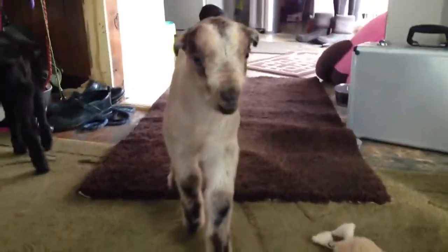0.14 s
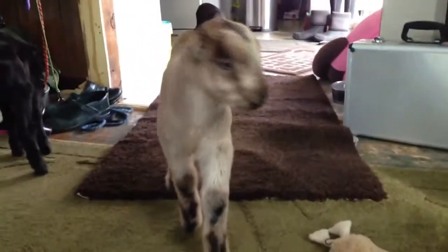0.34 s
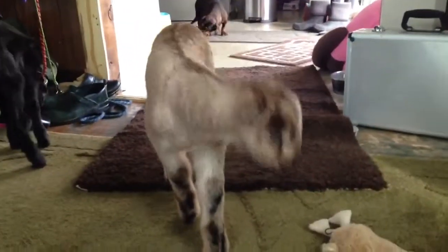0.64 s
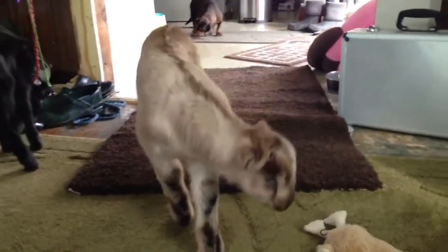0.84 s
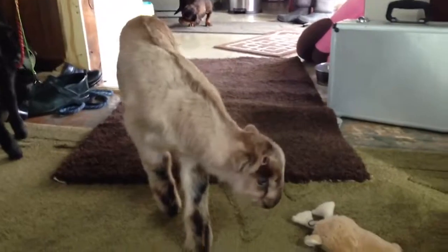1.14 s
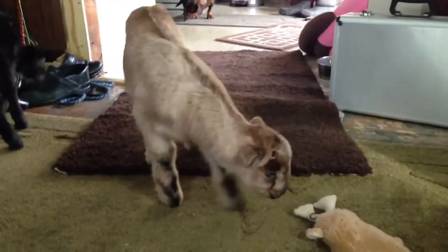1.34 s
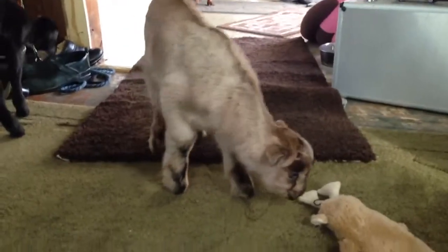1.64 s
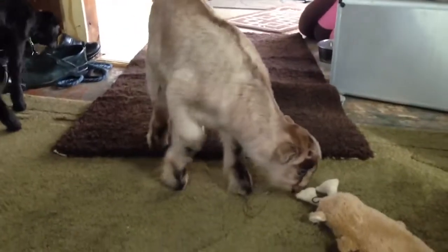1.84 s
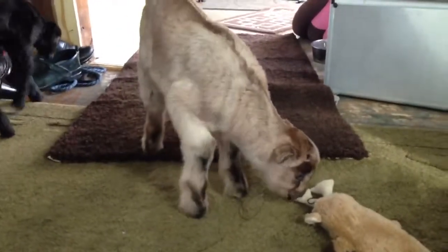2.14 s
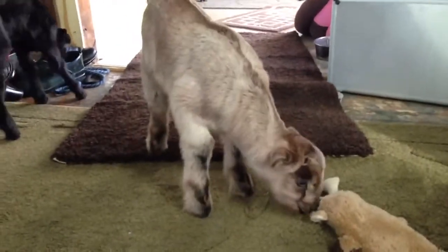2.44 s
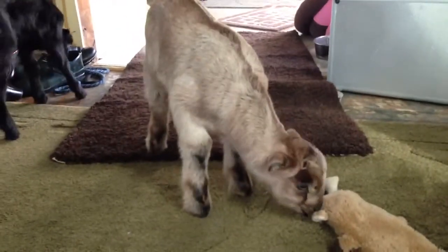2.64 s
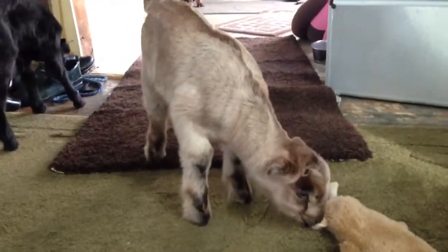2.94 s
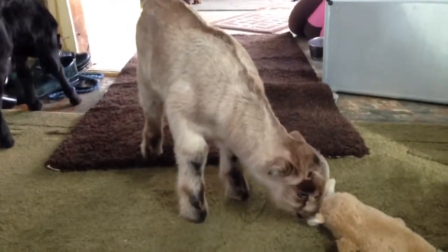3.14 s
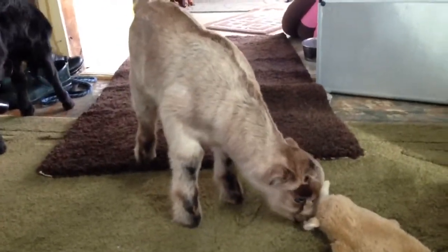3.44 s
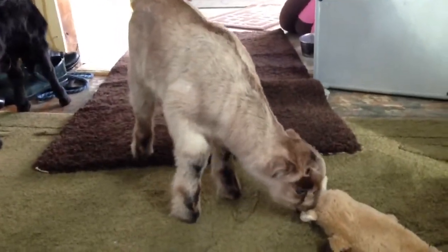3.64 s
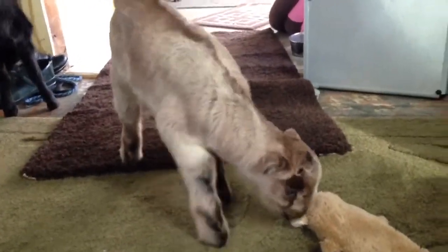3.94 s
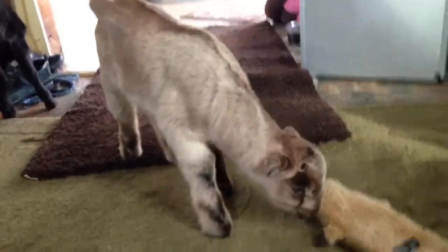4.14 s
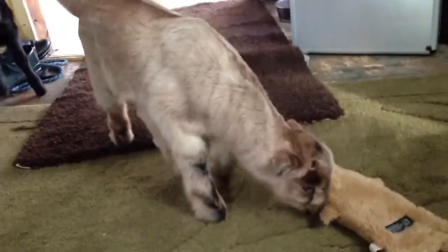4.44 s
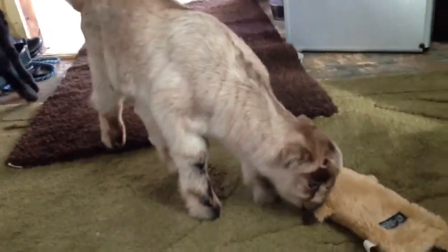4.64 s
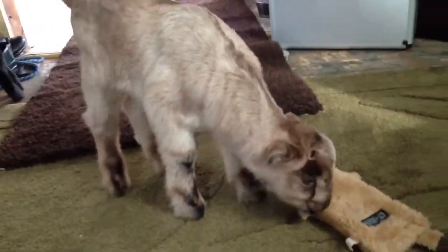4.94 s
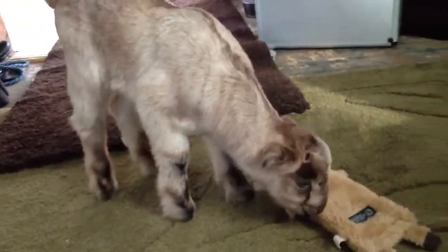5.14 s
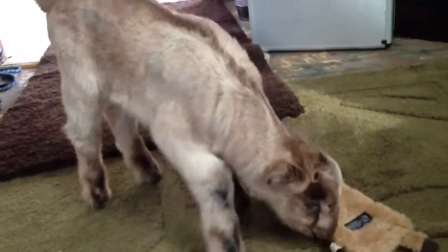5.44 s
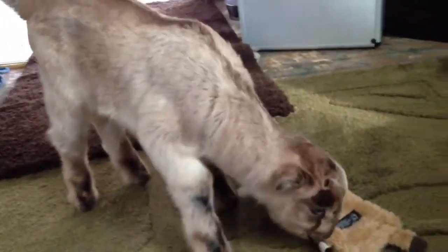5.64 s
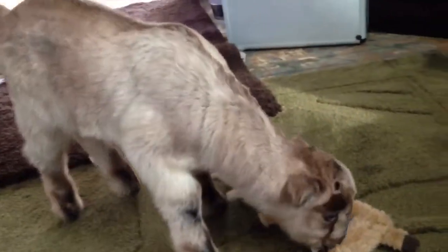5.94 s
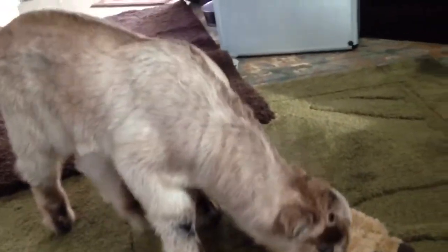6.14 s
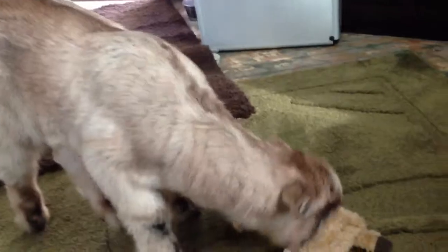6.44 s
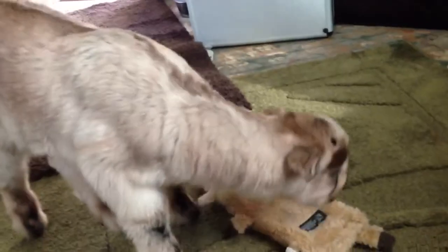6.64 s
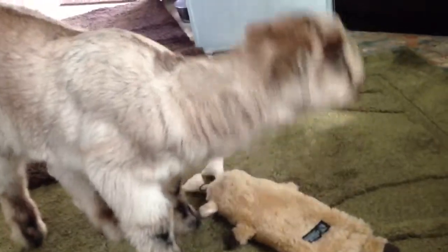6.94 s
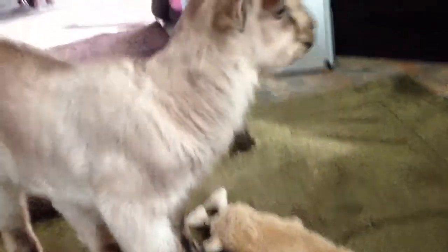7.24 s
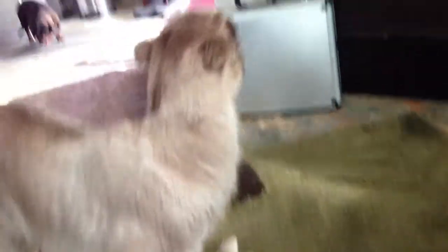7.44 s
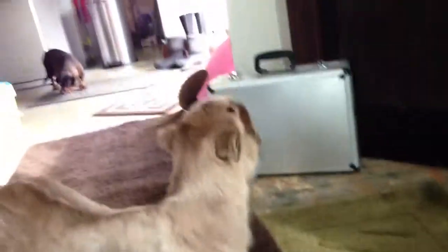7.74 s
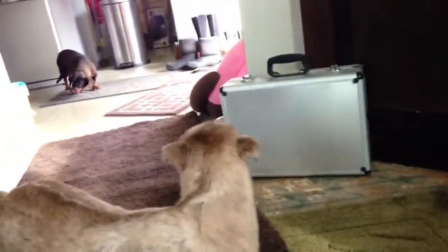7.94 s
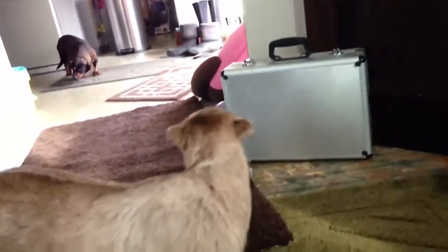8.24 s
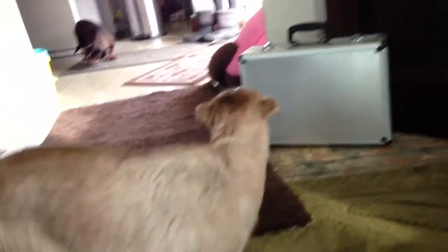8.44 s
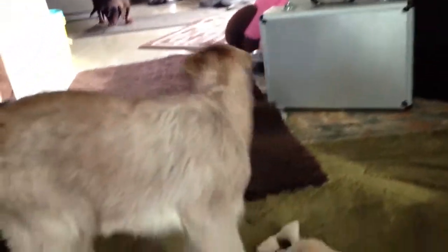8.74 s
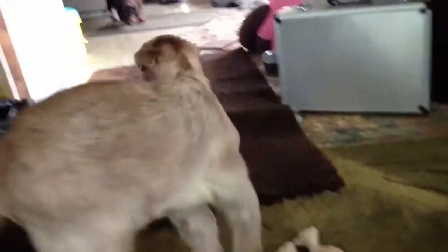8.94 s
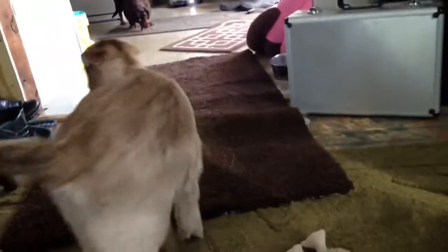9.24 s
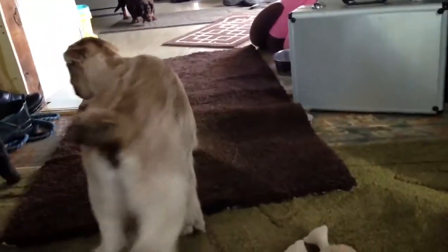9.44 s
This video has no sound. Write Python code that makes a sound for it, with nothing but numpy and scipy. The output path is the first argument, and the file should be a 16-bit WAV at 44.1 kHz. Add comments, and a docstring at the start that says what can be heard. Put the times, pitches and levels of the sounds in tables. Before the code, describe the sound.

A quiet, small carpeted room, heard through a close microphone with little deep bass and a faint constant hiss. From 0.5 seconds a goat kid's hooves make dull, padded thuds, with brushing scuffs around 1.4 and stronger steps and scrapes between 1.6 and 2.5. It then grows calmer, with very faint pads and a firmer, clickier thud at 4.5. From 5.6, thin wooden squeaks creep in, barely audible, sharpening at 6.6 into a brief squeak and a loud clatter of overlapping knocks until about 7.1, with soft shuffling. At 7.6 the kid bleats once: pitch scoops up quickly, then about six rapid, bright nasal throbs with hoarse air between them, weakening after 8.1 and gone by 8.35, with a short room tail. Soft steps, rustles and tiny ticks follow around 8.5 to 8.9, a firmer thud at 9.2, and light scuffs near 9.5.

```python
"""Goat kid bleating in a carpeted room

Close to the microphone a goat kid moves about and gives one loud, quavering bleat: throbbing voice partials
shaped by a moving mouth, with a hoarse rush of air. Its hooves thud on the carpet as short ringing modes;
rustles and scuffs are coloured noise. Something wooden out of sight squeaks in unsteady tones and clatters
in noise bursts. The small room answers with a brief diffuse tail, over a faint hiss."""
import sys
import numpy as np
from scipy import signal
from scipy.fft import rfft, irfft, next_fast_len
from scipy.io import wavfile
from scipy.ndimage import map_coordinates

SR = 44100
rng = np.random.default_rng(int(sys.argv[2]) if len(sys.argv) > 2 else 0)


def store_pcm(level_fs):
    """Save levels as 16-bit WAV."""
    pcm = np.round(np.clip(level_fs, -1, 1) * 32767).astype(np.int16)
    wavfile.write(sys.argv[1], SR, np.atleast_2d(pcm).T)


N = 422919

# The bleat's pitch scoops up, catches, then arches gently.
# Each row: time in seconds, pitch in Hz before the quaver.
BLEAT_PITCH = [(7.597, 270), (7.65, 348), (7.697, 323), (7.72, 372), (7.755, 384), (7.85, 380), (7.95, 387),
               (8.05, 397), (8.12, 405), (8.16, 382), (8.3, 385)]
# Throbs of the bleat. Each row: peak in seconds, gain in dB, half-width in seconds,
# brightness in dB per octave, first formant's added gain in dB, mouth narrowing from 0 to 1.
BLEAT_THROBS = [(7.636, -38.5, 0.022, -5.5, -3.5, 0.4), (7.746, -22.5, 0.014, 1.5, 4.5, 0),
                (7.848, -22, 0.013, .5, -0.5, 0.13), (7.958, -22.5, .016, -1, 1.5, .5),
                (8.055, -25.5, 0.02, -2, 1, 1), (8.151, -27.5, 0.014, -2, 3, 0.18)]
# Resonances of the mouth. Each row: Hz when closed, Hz when open, glide in Hz per second,
# shift in Hz when narrowed, width in Hz, gain in dB.
MOUTH_FORMANTS = [(606, 1196, 220, 110, 250, 3.5), (1370, 2780, -400, -480, 290, -8.5),
                  (1940, 3120, 640, -90, 240, -1.5), (3330, 4770, -300, -450, 400, -4),
                  (7400, 5860, 104, -1150, 470, -8.5)]
# Broad colour of the throat under the formants. Each row: frequency in Hz, gain in dB.
THROAT_COLOUR = [(300, -27.5), (400, -20), (780, -27.5), (2000, -17.5), (4000, -23.5), (6500, -18.5),
                 (7700, -20.5), (9200, -29.5), (10500, -31.5), (12000, -50), (15000, -47)]
# Roughness of the voice while pressed. Each row: frequency in Hz, roughness from 0 to 1.
VOICE_RASP = [(400, 0.05), (1200, 0.03), (3000, 0.23), (6000, 0.33), (10000, 0.53)]
# Hoarse rush of air through the open mouth. Each row: frequency in Hz, relative density in dB per Hz.
HOARSE_AIR = [(250, -36), (900, -15), (1300, 8), (1650, -13), (1900, -4.5), (2350, -1), (2750, -11),
              (3150, 3), (3800, -3), (4600, -1.5), (6200, -12), (9000, -18), (14000, -33)]
# Hooves on the carpet. Each row: start in seconds, level in dB, pitch in Hz, t60 in seconds,
# toe click in dB relative to the step.
HOOF_STEPS = [(.503, -44, 295, 0.043, -30), (.884, -59.5, 676, 0.17, -8), (1.094, -64, 890, 0.064, -12),
              (1.143, -51.5, 221, 0.093, -12), (1.618, -36.5, 725, 0.056, -12),
              (1.997, -32.5, 304, 0.076, -25), (2.2, -59, 850, .15, -8), (2.378, -49.5, 340, 0.072, -20),
              (2.439, -39.5, 240, 0.05, -14), (2.521, -47, 995, .08, -4), (2.828, -54, 450, .1, -10),
              (3.89, -65, 290, .11, -7), (4.484, -36.5, 187.5, 0.12, 2), (4.594, -58, 181, 0.071, -17),
              (4.75, -54, 900, 0.05, -3), (4.945, -57.5, 730, 0.096, -6), (5.04, -63, 990, 0.054, -1),
              (5.674, -59, 380, 0.15, -12), (8.546, -51, 418, .25, -22.5), (8.735, -49, 425, 0.3, -21),
              (9.170, -37.5, 187, 0.081, -5.5), (9.412, -53, 264, 0.1, -19), (9.502, -45.5, 404, .12, -10)]
# Modes of the floor. Each row: multiple of the step's pitch, relative level in dB.
FLOOR_MODES = [(0.619, -1.5), (.82, -1), (1, 4.5), (1.221, -3.5), (1.7, -12), (2.15, -16), (3, -25)]
# Scuffs and brushes. Each row: start in seconds, level in dB, brightness in dB per octave.
SCUFF_EVENTS = [(.588, -53.5, 0), (.683, -56.5, 0), (.752, -51.5, -0.5), (1.298, -59, -5),
                (1.376, -49.5, 1), (1.413, -46.5, 2.5), (1.468, -51, 4.5), (1.603, -38.5, -.5),
                (1.786, -47, 5), (1.892, -48.5, 2), (2.308, -55.5, 3), (2.432, -43.5, .5),
                (2.57, -48, -0.5), (2.933, -48.5, -1), (3.89, -64, -2), (5.374, -61, 1.5), (5.43, -61, 4),
                (5.774, -58, 7.5), (6.193, -54.5, 2), (8.595, -58.5, 4), (8.728, -50, 1.5), (9.055, -53, 0),
                (9.528, -52, -3.5)]
# Colour of scuffs and scrapes. Each row: frequency in Hz, relative density in dB per Hz.
FABRIC_COLOUR = [(90, -43), (170, -6.5), (400, 2.5), (550, 1), (720, 1), (1100, 1), (1600, -5.5),
                 (2500, -4.5), (4000, -9.5), (7000, -16.5), (11000, -27.5), (15000, -37.5)]
# Bouts of shuffling. Each row: start in seconds, length in seconds, level in dB, slope in dB per second.
SHUFFLE_BOUTS = [(0.665, .17, -58.5, -2), (1.354, 0.29, -51.5, 6), (1.63, 0.64, -55, -3.5),
                 (2.404, 0.64, -57, -12.5), (5.613, 0.15, -61, -10), (6.143, 0.082, -57.5, -18),
                 (6.93, .08, -46, -40), (7.06, 0.5, -52.5, -10.5), (8.616, 0.54, -52, -4.5),
                 (9.07, 1, -55.5, -24)]
# Colour of the shuffling. Each row: frequency in Hz, relative density in dB per Hz.
SHUFFLE_COLOUR = [(71, -41), (120, -9.5), (324, -6.5), (361, -10), (433, 1), (537, -7), (785, -7.5),
                  (860, -7), (958, -9), (2280, -10.5), (2990, -14.5), (9000, -30.5), (11700, -55),
                  (19800, -120)]
# Tiny clicks. Each row: start in seconds, level in dB.
TINY_TICKS = [(8.79, -44), (8.853, -47.5), (8.889, -56)]
# Wooden clatter. Each row: start in seconds, level in dB, t60 in seconds,
# brightness in dB per octave, bass lift in dB.
WOOD_KNOCKS = [(6.614, -35, 0.062, 5, -11.5), (6.695, -26, 0.11, -1, -10.5), (6.779, -20, 0.074, .5, 3.5),
               (6.955, -26.5, 0.076, 1.5, 9), (7.058, -33.5, .076, -3.5, -.5), (7.118, -42, 0.19, -3.5, 1)]
# Broad colour of the wood. Each row: frequency in Hz, relative density in dB per Hz.
WOOD_COLOUR = [(120, -41), (200, -14), (300, -10.5), (440, -2.5), (760, 3), (940, -10), (1150, 0),
               (1450, -3), (1900, -4), (2650, -3.5), (3500, -12), (6500, -22), (10000, -34), (15000, -39)]
# Resonances of the wood. Each row: centre in Hz, width in Hz, strength in dB (a quarter of it counts).
WOOD_RESONANCES = [(432, 41, 17), (1420, 33, -18), (1860, 53, 33), (2220, 15, -37), (2600, 54, -5),
                   (4180, 75, 10), (6840, 66, -16), (7840, 31, -35)]
# Squeaks. Each row: start in seconds, length in seconds, gain in dB, brightness in dB per octave.
SQUEAK_EVENTS = [(5.596, 0.28, -67.5, -19), (6.098, 0.15, -61.5, -11), (6.3, .32, -67, -12),
                 (6.542, .055, -51, -2.5), (6.614, 0.039, -36.5, 1.5), (6.66, 0.03, -45, -13)]
# Partials of the squeaking wood. Each row: frequency in Hz, relative level in dB.
SQUEAK_PARTIALS = [(1238, -6), (1857, -7.5), (2995, -0.5), (3700, -17), (4600, -14.5), (5400, -21)]
# Wood ringing on as it breaks free. Each row: frequency in Hz, level in dB, t60 in seconds.
WOOD_RING = [(1836, -25, 0.052), (2650, -35, .15), (3225, -30.5, 0.19)]
# Colour of the background hiss. Each row: frequency in Hz, relative density in dB per Hz.
HISS_COLOUR = [(25, 9.5), (60, 1), (100, -10), (150, 0), (300, -0.5), (500, -5.5), (1000, -9),
               (1800, -10.5), (3100, -8), (6000, -9.5), (10000, -12), (15500, -12.5)]
# Decay of the room. Each row: frequency in Hz, t60 in seconds.
ROOM_DECAY = [(200, .28), (1200, 0.34), (4000, 0.25), (8000, 0.28), (14000, 0.12)]

OPEN_S, OPENING_S = 7.712, 0.076  # the mouth is wide open by then, and takes this long to open
ONSET_S, RELAX_S, RELEASE_S = 0.022, 8.18, 0.035  # full voice comes on this fast, holds until then, lets go
VOICE_TRAIL_DB, AIR_TRAIL_DB = -16, -10  # a weak, airy trail remains
FADE_S, END_S = 0.05, 8.335  # the trail fades out over this long and ends then
QUAVER, QUAVER_LAG_S = 0.016, 0.021  # pitch dips by about this share before each throb and lifts after it
TOE_HZ, TOE_OCTAVES, TOE_T60 = 550, 0.86, 0.043  # the hard toe's dull click: centre, spread, decay in s
SCRAPE_DB, USUAL_STEP_DB = -59.5, -49  # scrape of a step of the usual force
SCRAPE_GROWS = 0.49  # dB of scrape per dB of force
PADS_PER_S, PAD_DB, PAD_HZ = 2.2, -64.5, 563  # light shifts of weight
SCUFF_RISE_S, SCUFF_T60 = 0.01, 0.26
BOUT_RISE_S, BOUT_T60 = 0.067, 0.39
KNOCK_DB, KNOCK_RISE_S, KNOCK_EDGE_HZ = -26.5, 0.01, 9800  # a typical knock: level, build-up, top edge
EDGE_DB_PER_OCTAVE, RISE_DB_PER_DOUBLING = 8, 31  # harder knocks reach higher and build up for longer
RING_S, RING_RISE_S = 6.7, 0.018
HISS_DB = -63.5
TOP_HZ = 15720  # the recorder's band limit


def bleat(held_db=-46, air_db=-43.0, jitter=0.002, slack=4, lead_s=0.003, echo_s=0.026, echo_db=-11):
    """Vocal folds, pressed about ten times a second, turn hoarse between the throbs."""
    start, end = BLEAT_PITCH[0][0], END_S
    t = np.arange(round(start * SR), round(end * SR)) / SR
    throbs = throbbing(t)
    # the folds tighten just before each throb peaks
    pressed = np.interp(t + lead_s, t, np.minimum(throbs.sum(0), 1))
    onset = np.clip(1 + (t - OPEN_S) / ONSET_S, 0, 1)
    release = np.clip((t - RELAX_S) / RELEASE_S, 0, 1)
    full_voice = onset * amp(VOICE_TRAIL_DB * release)
    unsteady = 1 + slack * (1 - pressed * full_voice)  # slack folds beat unevenly

    lift = QUAVER * (throbbing(t - QUAVER_LAG_S).sum(0) - throbbing(t + QUAVER_LAG_S).sum(0))
    pitch = curves(BLEAT_PITCH, t)[0] * (1 + lift + jitter * unsteady * wobble(250, len(t)))

    puffs = 1 + 0.5 * np.cos(2 * np.pi * np.cumsum(pitch) / SR)  # air escapes once a cycle
    rush = noise(lambda hz: along(HOARSE_AIR, hz), len(t))
    air = amp(air_db + AIR_TRAIL_DB * release) * onset * puffs * rush

    effort = amp(held_db) * full_voice + amp(np.array(BLEAT_THROBS)[:, 1]) @ throbs
    voice = effort * harmonics(t, pitch, pressed, unsteady)

    fade = np.clip(np.minimum((t - start) / 0.004, (end - t) / FADE_S), 0, 1)
    call = (voice + air) * fade
    far_wall = amp(echo_db) * filtered(call, lambda hz: 1 / (1 + 1j * hz / 4000))
    out = np.zeros(N)
    add(out, start, call)
    add(out, start + echo_s, far_wall)
    return out


def throbbing(t):
    """Each press of the folds swells and eases as a bell curve from 0 to 1."""
    return np.array([np.exp(-((t - s) / width) ** 2) for s, db, width, *_ in BLEAT_THROBS])


def harmonics(t, pitch, pressed, unsteady, strain_db=2, spread=0.116):
    """The folds' partials, coloured by the throat and the moving mouth."""
    phase = 2 * np.pi * np.cumsum(pitch) / SR
    *_, bright_db, first_db, narrowing = curves(BLEAT_THROBS, t)
    bright_db = bright_db + strain_db * (pressed - 1)  # harder pressing closes the folds more sharply
    resonances = []
    for i, (centre, row) in enumerate(zip(formants(t, narrowing), MOUTH_FORMANTS)):
        *_, width, db = row
        resonances.append((centre, width, db + first_db * (i == 0)))
    voice = np.zeros(len(t))
    for k in np.arange(1, 39):
        hz = k * pitch
        mouth = sum(amp(db) / (1 + ((hz - centre) / width) ** 2) ** 2 for centre, width, db in resonances)
        tilt = amp(bright_db * np.maximum(octaves(hz), -1.5))
        gain = (mouth + amp(along(THROAT_COLOUR, hz))) * tilt
        # resonances ring on after each closure
        ring_lag = sum(np.arctan((hz - centre) / width) for centre, width, db in resonances)
        fold_lag = spread * k ** 2  # the folds close gradually along their length
        rasp = np.minimum(along(VOICE_RASP, hz) * unsteady, 0.95)
        rough = unit(wobble(330, len(t)) + 1j * wobble(330, len(t)))
        tone = np.sqrt(1 - rasp ** 2) + rasp * rough
        voice += gain * np.real(tone * np.exp(1j * (k * phase - ring_lag - fold_lag)))
    return voice


def formants(t, narrowing):
    """Centres of the mouth's resonances: it opens, drifts, and narrows on some throbs."""
    opening = np.clip(1 + (t - OPEN_S) / OPENING_S, 0, 1)
    centres = []
    for closed, wide, glide, shift, *_ in MOUTH_FORMANTS:
        travel = wide - closed + glide * (t - OPEN_S) + shift * narrowing
        centres.append(closed + opening * travel)
    return centres


def hooves(second_s=0.019, second_db=-8, pad_t60=0.094, pad_toe_db=-10):
    """Each step rings the padded floor twice, toe and heel, with a scrape; light pads fall at random."""
    out, t = np.zeros(N), np.arange(SR // 3) / SR
    pads = []
    for u, v in rng.random((round(PADS_PER_S * N / SR), 2)):
        pad_pitch = PAD_HZ * 2 ** (2 * v - 1)  # within an octave either way
        pads.append((u * N / SR, PAD_DB, pad_pitch, pad_t60, pad_toe_db))
    toe_colour = lambda hz: -20 * np.log10(1 + (np.log2((hz + 1) / TOE_HZ) / TOE_OCTAVES) ** 4)
    for s, db, pitch, t60, toe_db in [*HOOF_STEPS, *pads]:
        toe = noise(toe_colour, len(t)) * swell(t, 0.0037, TOE_T60)
        add(out, s, amp(db + toe_db) * toe)
        # relative to the step, and never above it
        scrape_db = min(SCRAPE_DB + SCRAPE_GROWS * (db - USUAL_STEP_DB) - db, 0)
        for delay, blow_db in [(0, 0), (second_s, second_db)]:
            ring = np.zeros(len(t))
            for ratio, level in FLOOR_MODES:
                strength = amp(level + rng.normal(0, 2.4))
                ring += strength * np.sin(2 * np.pi * (pitch * ratio * t + rng.random()))
            scrape = amp(scrape_db) * noise(lambda hz: along(FABRIC_COLOUR, hz), len(t))
            add(out, s + delay, amp(db + blow_db) * (unit(ring) + scrape) * swell(t, 0.0041, t60))
    return out


def rustling():
    """Fibres catch and slip: sharper scuffs, a few ticks, and soft shuffling in bouts."""
    out, t = np.zeros(N), np.arange(SR // 2) / SR
    for s, db, bright_db in SCUFF_EVENTS:
        grit = noise(lambda hz: along(FABRIC_COLOUR, hz) + bright_db * octaves(hz), len(t), grain_db=1.5)
        add(out, s, amp(db) * grit * swell(t, SCUFF_RISE_S, SCUFF_T60))
    for s, db in TINY_TICKS:
        tick = noise(lambda hz: 4 * octaves(hz), len(t))
        add(out, s, amp(db) * tick * swell(t, 0.00044, 0.008))
    clock = np.arange(N) / SR
    bouts = [amp(db) * bout(clock - s, length, slope_db) for s, length, db, slope_db in SHUFFLE_BOUTS]
    level = np.max(bouts, axis=0)
    flicker = amp(-2.5 + 2.7 * wobble(35, N))
    return out + level * flicker * noise(lambda hz: along(SHUFFLE_COLOUR, hz), N, grain_db=0.5)


def bout(t, length, slope_db):
    """A bout of shuffling comes on, drifts in level while it lasts, then dies away."""
    drift_db = slope_db * np.clip(t, 0, length)
    decay_db = -60 * np.maximum(t - length, 0) / BOUT_T60
    return np.clip(1 + t / BOUT_RISE_S, 0, 1) * amp(drift_db + decay_db)


def clatter(mode_db=4, wet_db=-7.5):
    """Loose wood rattles in a cluster of knocks: noise coloured by its resonances and each contact."""
    out, t = np.zeros(N), np.arange(SR // 2) / SR

    def body(hz):
        """Broad colour of the wood with resonant peaks, in dB."""
        peaks = sum(mode_db * amp(db / 4) / (1 + ((hz - centre) / width) ** 2)
                    for centre, width, db in WOOD_RESONANCES)
        return along(WOOD_COLOUR, hz) + peaks

    for s, db, t60, bright_db, bass_db in WOOD_KNOCKS:
        edge_hz = KNOCK_EDGE_HZ * 2 ** ((db - KNOCK_DB) / EDGE_DB_PER_OCTAVE)
        rise = KNOCK_RISE_S * 2 ** ((db - KNOCK_DB) / RISE_DB_PER_DOUBLING)

        def contact(hz):
            """Tilt, bass lift and top edge of this knock, in dB."""
            bass = bass_db / (1 + (hz / 1000) ** 2)
            return bright_db * octaves(hz) + bass - 10 * np.log10(1 + (hz / edge_hz) ** 10)

        rattle = noise(lambda hz: body(hz) + contact(hz), len(t), grain_db=2.0)
        add(out, s, room(amp(db) * rattle * swell(t, rise, t60), wet_db))
    return out


def squeaks():
    """Rubbing wood sticks and slips in short, unsteady tones, and rings on when it breaks free."""
    out, t = np.zeros(N), np.arange(SR // 3) / SR
    for s, length, db, bright_db in SQUEAK_EVENTS:
        size = round(length * SR)
        tones = sum(amp(level + bright_db * octaves(hz)) * partial(hz, size) for hz, level in SQUEAK_PARTIALS)
        add(out, s, amp(db) * signal.windows.tukey(size, 0.6) * tones)
    ring = sum(amp(db) * swell(t, RING_RISE_S, t60) * partial(hz, len(t)) for hz, db, t60 in WOOD_RING)
    add(out, RING_S, ring)
    return out


def partial(hz, size, waver=0.011, flutter_db=2):
    """A tone of the rubbed wood, unsteady in pitch and level."""
    slip = 2 * np.pi * np.cumsum(hz * (1 + waver * wobble(194, SR)[:size])) / SR
    return amp(flutter_db * wobble(120, SR)[:size]) * np.sin(slip)


def hiss():
    """Faint, steady coloured noise behind everything."""
    return amp(HISS_DB) * noise(lambda hz: along(HISS_COLOUR, hz), N)


def room(x, wet_db, build=0.0062):
    """Reflections as a diffuse noise tail that builds up, then dies at its own rate in each band."""
    hz, t, z = signal.stft(rng.standard_normal(SR // 2), SR, nperseg=256)
    decay = amp(-60 * t / along(ROOM_DECAY, hz)[:, None])
    tail = signal.istft(z * decay * (1 - np.exp(-t / build)), SR, nperseg=256)[1]
    return x + amp(wet_db) * signal.fftconvolve(x, tail / np.linalg.norm(tail))[:len(x)]


def amp(db):
    """Decibels to gain."""
    return 10 ** (np.asarray(db) / 20)


def unit(x):
    """Scale to rms 1."""
    return x / np.sqrt(np.mean(np.abs(x) ** 2) + 1e-20)


def along(points, hz):
    """(Hz, value) points read on a log axis."""
    f, v = np.transpose(points)
    return np.interp(np.log(hz + 1), np.log(f + 1), v)


def curves(rows, t):
    """Each column after the time, read at the times t."""
    s, *cols = np.transpose(rows)
    return [np.interp(t, s, c) for c in cols]


def wobble(rate, size):
    """A smooth random curve, rate knots a second."""
    knots = rng.standard_normal(size // 8)
    return map_coordinates(knots, [np.arange(size) * rate / SR], mode="wrap")


def filtered(x, response):
    """x times a response of frequency."""
    size = next_fast_len(len(x) + 8192)
    return irfft(rfft(x, size) * response(np.fft.rfftfreq(size, 1 / SR)), size)[:len(x)]


def noise(colour_db, size, grain_db=0):
    """Coloured noise of rms 1, clumped into grains."""
    grains = rng.standard_normal(size) * amp(grain_db * wobble(900, size))
    return unit(filtered(grains, lambda hz: amp(colour_db(hz))))


def octaves(hz):
    """Octaves above 1500 Hz, the pivot of every brightness tilt."""
    return np.log2(np.maximum(hz, 100) / 1500)


def swell(t, rise, t60):
    """A linear rise, then an exponential fall."""
    return np.minimum(t / rise, 1) * amp(-60 * np.maximum(t - rise, 0) / t60)


def add(track, s, sound):
    """Mix a sound in at s seconds, cut off at the end of the track."""
    start = round(s * SR)
    track[start:start + len(sound)] += sound[:max(N - start, 0)]


def scene():
    """The goat close by is fairly dry; the wood farther off carries more of the room."""
    background = hiss()
    goat = room(bleat(), wet_db=-10.0) + room(hooves(), wet_db=-11.5)
    carpet = room(rustling(), wet_db=-11.5)
    wood = clatter() + room(squeaks(), wet_db=-9)  # each knock already carries its room
    return (goat + carpet + wood + background)[None]


def record(dry, low_cut_hz=105):
    """The small microphone drops the deep bass; the recorder keeps nothing above its band limit."""
    low_cut = signal.butter(4, low_cut_hz, "highpass", fs=SR, output="sos")
    thin = signal.sosfilt(low_cut, dry[0])
    return filtered(thin, lambda hz: hz < TOP_HZ)[None]


dry = scene()
out = record(dry)
store_pcm(out)
```